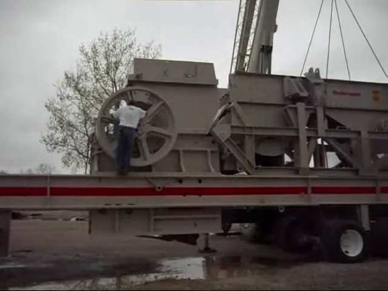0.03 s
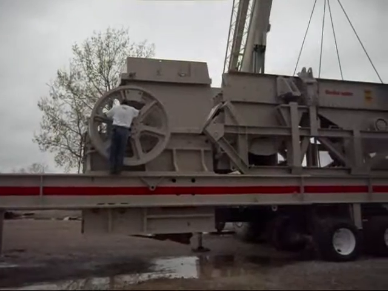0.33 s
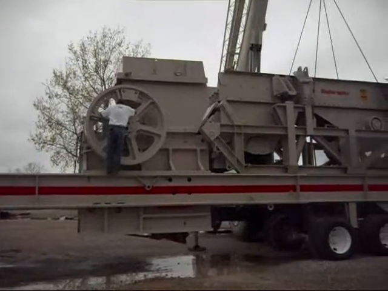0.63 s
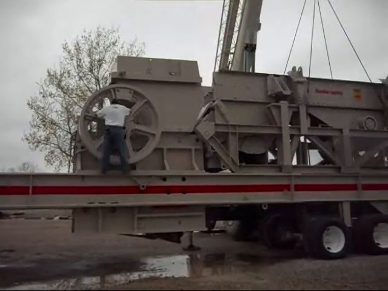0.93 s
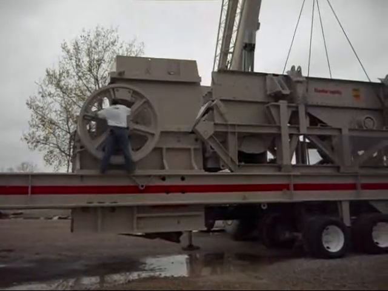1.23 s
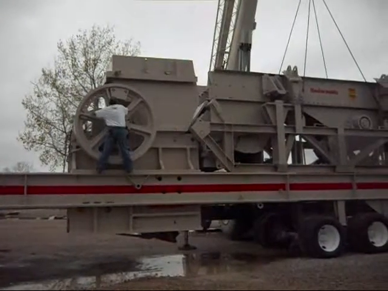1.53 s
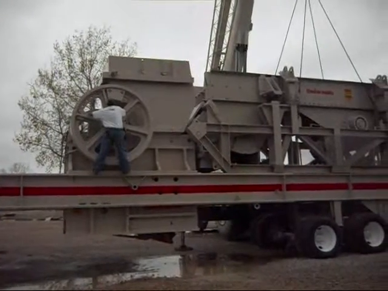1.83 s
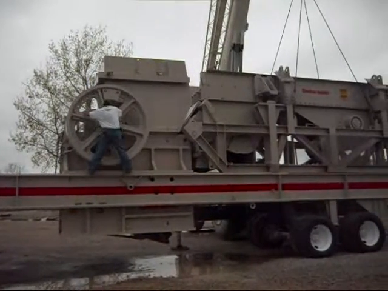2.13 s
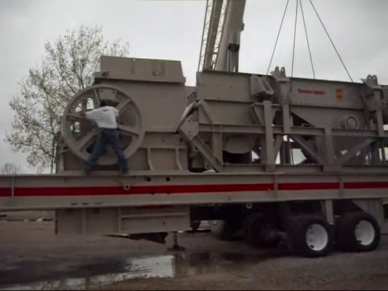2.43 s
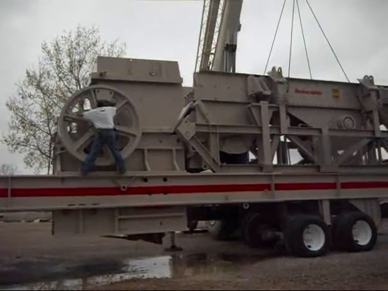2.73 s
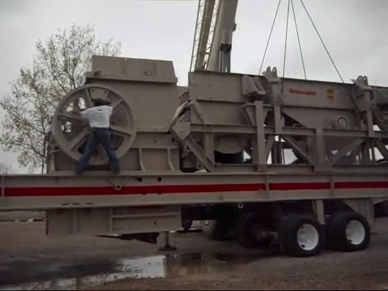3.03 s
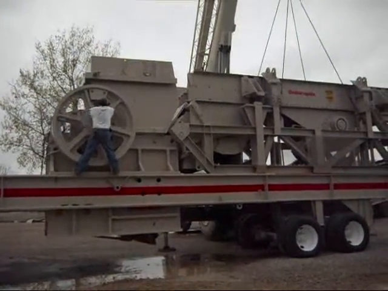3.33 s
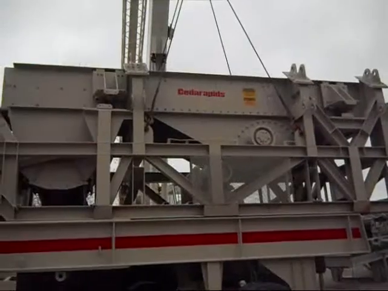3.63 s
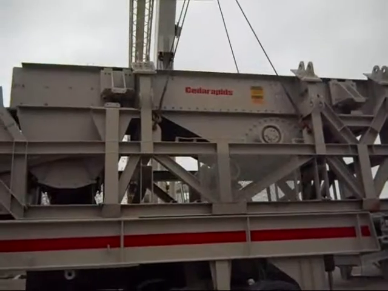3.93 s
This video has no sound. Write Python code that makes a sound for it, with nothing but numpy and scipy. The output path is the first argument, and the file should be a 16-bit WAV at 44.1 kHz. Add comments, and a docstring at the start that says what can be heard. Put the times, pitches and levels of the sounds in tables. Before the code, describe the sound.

A diesel engine throbs and clatters steadily in an open yard. Steel clanks twice at the start, a hiss builds and wind bumps the microphone. Near the end, after a tick, the hiss drops and a second engine booms.

```python
"""An open yard beside a jaw crusher plant, where a four-cylinder diesel runs steadily.
Its exhaust throbs, and combustion and valve knocks ring its body into a hard, repeating clatter.
An airy hiss builds, a second engine hums, wind bumps the microphone and steel clanks twice at the start.
Near the end the listening position jumps with a tick: the second engine booms and the hiss drops.
The whole yard is heard through a narrow, telephone-like band."""
import sys
import numpy as np
from scipy import signal
from scipy.fft import rfft, irfft, next_fast_len
from scipy.io import wavfile
from scipy.ndimage import uniform_filter1d, map_coordinates

SR = 44100
rng = np.random.default_rng(int(sys.argv[2]) if len(sys.argv) > 2 else 0)


def output_pcm(signal):
    """Save a mono or channel-first signal as 16-bit PCM at the path in sys.argv[1].

    Samples are clipped to [-1, 1] before scaling.
    """
    pcm = np.clip(np.atleast_2d(signal).T, -1, 1) * 32767
    wavfile.write(sys.argv[1], SR, np.round(pcm).astype(np.int16))


N = 176400
TIME_S = np.arange(N) / SR
JUMP_S = 3.532  # the listening position jumps here


def amp(db):
    """Decibels to gain."""
    return 10 ** (np.asarray(db) / 20)


def unit(x):
    """Scale to rms 1."""
    return x / np.sqrt(np.mean(x ** 2) + 1e-20)


def along(spectrum, hz):
    """Read (freq_hz, level_db) points on a log frequency axis."""
    freq_hz, level_db = np.transpose(spectrum)
    return np.interp(np.log(hz + 1), np.log(freq_hz + 1), level_db)


def curves(rows):
    """One automation curve for each column after the time."""
    time_s, *columns = np.transpose(rows)
    return [np.interp(TIME_S, time_s, column) for column in columns]


def wobble(knots_per_s):
    """A smooth random drift."""
    return map_coordinates(rng.standard_normal(256), [TIME_S * knots_per_s], mode="wrap")


def filtered(x, response):
    """EQ x with a gain given as a function of frequency."""
    size = next_fast_len(N + SR // 2)
    return irfft(rfft(x, size) * response(np.fft.rfftfreq(size, 1 / SR)), size)[:N]


def noise(spectrum, patchy_db=0):
    """Coloured noise of rms 1, mottled by patches of random gain in time and frequency."""
    bins = signal.stft(rng.standard_normal(N), nperseg=512)[2]
    patches = uniform_filter1d(rng.standard_normal(bins.shape), size=5, axis=0)
    patches = uniform_filter1d(patches, size=12, axis=1)
    mottled = signal.istft(bins * amp(patchy_db * unit(patches)), nperseg=512)[1][:N]
    return unit(filtered(mottled, lambda hz: amp(along(spectrum, hz))))


def lowpass(x, edge_hz, order=160):
    """A steep low-pass with a rounded edge."""
    return filtered(x, lambda hz: 1 / np.sqrt(1 + (hz / edge_hz) ** order))


# Low partials of the exhaust: firing_multiple, level_db
THROB_PARTIALS = [(1, -27), (2, -22.5), (3, -41)]
# Gentle swell on top of those levels: time_s, gain_db
THROB_SWELL = [(0, -2.5), (.8, 2), (1.25, 1.5), (1.6, -1), (2.4, 1), (3.1, -0.2), (3.5, 0), (4, -2)]


def exhaust_throb(cycles, lag_cycles=.115):
    """Four firings a cycle pulse out of the exhaust."""
    phase = 2 * np.pi * 4 * (cycles - lag_cycles)
    throb = sum(amp(db) * np.cos(multiple * phase) for multiple, db in THROB_PARTIALS)
    return np.sqrt(2) * throb * amp(curves(THROB_SWELL)[0])


# The knock rhythm of one engine cycle: position_cycles, accent_db
KNOCK_PATTERN = [(0.039, -6), (.09, -0.5), (0.273, 0), (.35, -1), (.43, 0), (0.521, -1.5), (0.576, -1),
                 (.67, -6), (.78, 0), (.85, 0.5), (0.942, -6.5)]


def knock_envelope(cycles, cycle_hz, rise_s=.0012, decay_s=.0045):
    """Combustion and valve knocks: sharp hits that add in power over a steady floor."""
    power = amp(-1.5) ** 2  # the floor between knocks
    for position, accent_db in KNOCK_PATTERN:
        age_s = (cycles - position) % 1 / cycle_hz
        hit = 2 * amp(accent_db) * (1 - np.exp(-age_s / rise_s)) * np.exp(-age_s / decay_s)
        power = power + hit ** 2
    return unit(np.sqrt(power))


# The bed of weak tones in the clatter: pitch_hz, level_per_tone_db
CLATTER_BED = [(20, -78), (90, -53.5), (150, -47), (400, -51), (600, -49.5), (900, -50), (1200, -51),
               (1600, -48.5), (2100, -62), (3300, -64), (4000, -85)]
# Strong body tones, ahead of their lift: cycle_multiple, before_jump_db, after_jump_db
BODY_TONES = [(20, -38, -39), (26, -39, -47), (32, -38, -45), (34, -31, -38), (44, -39, -47),
              (60, -36, -47), (72, -39, -47), (78, -41, -45), (79, -39, -47), (81, -41, -47),
              (84, -41, -47), (92, -39, -47), (95, -39, -47), (96, -35, -47), (98, -39, -47),
              (108, -41, -47), (110, -41, -47), (113, -42, -47), (114, -41, -47), (115, -40, -47),
              (118, -42, -47), (123, -40, -47), (124, -35, -47), (126, -38, -47), (128, -43, -47),
              (131, -43, -47), (138, -43, -47), (140, -35, -47), (147, -41, -47), (150, -41, -47),
              (152, -38, -47), (156, -43, -47), (159, -42, -47), (170, -43, -47), (179, -42, -47),
              (183, -43, -47)]


def clatter(cycles, cycle_hz, after_jump, lift_db=.72, size=8192):
    """The knocks ring the engine body alike in every cycle, which makes a dense comb of tones."""
    position = np.arange(size) / size
    comb = rfft(knock_envelope(position, cycle_hz) ** 2 * rng.standard_normal(size))
    level_db = along(CLATTER_BED, np.arange(len(comb)) * cycle_hz)
    multiples, before_db, after_db = np.transpose(BODY_TONES)
    level_db[np.round(multiples).astype(int)] = (after_db if after_jump else before_db) + lift_db
    # The phases carry the knock rhythm; the tables set the tone colour.
    loop = irfft(comb / np.abs(comb) * amp(level_db)) * size / np.sqrt(2)
    return np.interp(cycles, position, loop, period=1)


# Rattle colour before and after the jump: freq_hz, relative_db
RATTLE_EQ_BEFORE = [(30, -6), (150, -5.5), (230, -6.5), (300, -3), (450, -5), (700, -2.5), (1000, -1),
                    (1500, -4), (2050, -18), (2600, -9), (3050, -13), (3350, -10), (3750, -19.5),
                    (4000, -45.5)]
RATTLE_EQ_AFTER = [(30, -17), (300, -5), (600, -0.5), (1000, -0.5), (1500, -9.5), (2000, -18), (2600, -5.5),
                   (3050, -14), (3350, -15), (3750, -20), (4000, -43)]


def rattle(cycles, cycle_hz, after_jump):
    """The loose part of the clatter: noise that pulses with the knocks and never repeats."""
    texture = noise(RATTLE_EQ_AFTER if after_jump else RATTLE_EQ_BEFORE, patchy_db=1.18)
    return amp(-21) * knock_envelope(cycles, cycle_hz) * texture


# Near-steady pace of the four-stroke cycle: time_s, cycle_hz
ENGINE_SPEED = [(0, 7.8), (1.8, 7.796), (2.6, 7.813), (4, 7.815)]
# Fader ride on clatter and rattle, played around its average: time_s, relative_db
CLATTER_RIDE = [(0, -22), (.5, -21.5), (.8, -20.5), (1.2, -19.5), (1.3, -21.5), (2.3, -22), (3.45, -21.5),
                (3.72, -20), (4, -23)]


def diesel():
    """Exhaust throb, repeating clatter and loose rattle, all tied to the crankshaft."""
    cycles = np.cumsum(curves(ENGINE_SPEED)[0]) / SR
    cycle_hz = ENGINE_SPEED[0][1]
    knocks = np.zeros(N)
    for layer in (clatter, rattle):
        before = layer(cycles, cycle_hz, after_jump=False)
        after = layer(cycles, cycle_hz, after_jump=True)
        knocks += np.where(TIME_S < JUMP_S, before, after)
    ride_db, = curves(CLATTER_RIDE)
    return exhaust_throb(cycles) + amp(ride_db - ride_db.mean()) * knocks


# Build and drop of the hiss: time_s, level_db
HISS_RIDE = [(0, -46.5), (.7, -33.5), (1.5, -34), (1.9, -29), (2.4, -30.5), (2.85, -25.5), (3.51, -23.5),
             (3.54, -41), (4, -36.5)]
# Airy colour, strongest near 2 kHz: freq_hz, relative_db
HISS_EQ = [(300, -28), (1100, -9.5), (1600, -2), (2000, -2), (2500, -9.5), (3200, -15), (3750, -23),
           (4000, -42.5)]


def hiss():
    """A smooth airy hiss that grows until the position jumps."""
    return amp(curves(HISS_RIDE)[0]) * noise(HISS_EQ, patchy_db=-1.14)


# A hum that booms after the jump: time_s, pitch_hz, fundamental_db, octave_db
HUM_RIDE = [(0, 94.6, -34, -36), (1.2, 93.53, -40.5, -32.5), (2.1, 93.2, -31.5, -33.5),
            (2.55, 94.5, -46.5, -28), (2.75, 95.7, -20.5, -33.5), (3.05, 93.4, -34.5, -33),
            (3.5, 92.1, -32.5, -36), (3.56, 90.9, -15, -30.5), (3.76, 93.14, -12, -25.5),
            (3.9, 96.36, -16, -37), (4, 96.4, -12, -53)]


def second_engine(waver_hz=1.3, waver_db=2.5):
    """A wavering exhaust hum: the firing tone and its octave."""
    pitch_hz, fundamental_db, octave_db = curves(HUM_RIDE)
    phase = 2 * np.pi * np.cumsum(pitch_hz + waver_hz * wobble(5.5)) / SR
    fundamental = amp(fundamental_db) * np.sin(phase)
    octave = amp(octave_db + waver_db * wobble(9)) * np.sin(2 * phase)
    return np.sqrt(2) * (fundamental + octave)


# Rise and fall of the breeze: time_s, level_db
WIND_RIDE = [(0, -25), (.2, -31), (.7, -34.5), (.9, -18), (1.25, -25.5), (1.42, -25.5), (2.03, -27.5),
             (2.16, -20), (2.3, -26), (2.42, -28), (2.75, -23.5), (3, -30.5), (3.35, -23.5), (3.65, -24),
             (4, -41.5)]
# Deep buffeting colour: freq_hz, relative_db
WIND_EQ = [(5, 0), (25, -2), (45, 0), (80, -2.5), (130, -6.5), (220, -15), (600, -47)]


def wind_rumble():
    """Soft gusts rumble on the microphone."""
    return amp(curves(WIND_RIDE)[0]) * noise(WIND_EQ, patchy_db=2.5)


# A firm clank, then a faint one: start_s, strength_db
CLANK_HITS = [(.097, -16.5), (.355, -29)]
# Dull steel colour in two broad humps: freq_hz, relative_db
CLANK_EQ = [(200, -27.5), (700, -2), (1100, 0.5), (2000, -12.5), (2800, -3.5), (3400, -1.5), (4000, -29.5)]


def steel_clanks(rise_s=.012, decay_s=.019):
    """Short scraping clanks of heavy steel, with hardly any ring."""
    envelope = np.zeros(N)
    for start_s, strength_db in CLANK_HITS:
        age_s = np.maximum(TIME_S - start_s, 0)
        envelope += 2 * amp(strength_db) * (1 - np.exp(-age_s / rise_s)) * np.exp(-age_s / decay_s)
    return envelope * noise(CLANK_EQ)


# Sudden gusts: centre_s, level_db
THUMP_HITS = [(1.07, -26), (2.15, -17.5), (2.2, -19.5)]
# Round, bassy colour: freq_hz, relative_db
THUMP_EQ = [(20, -6), (70, 0), (125, -0.5), (200, -6.5), (300, -21.5), (600, -51)]


def wind_thumps(half_width_s=.03):
    """Sudden gusts thump the microphone, each a brief swell of low noise."""
    envelope = sum(amp(level_db) * np.exp(-((TIME_S - centre_s) / half_width_s) ** 2)
                   for centre_s, level_db in THUMP_HITS)
    return envelope * noise(THUMP_EQ)


def jump_tick(corner_hz=4000):
    """One thin tick, an impulse with softened treble, marks the jump in position."""
    impulse = amp(-6) * (np.arange(N) == round(JUMP_S * SR))
    return filtered(impulse, lambda hz: 2 / (1 + 1j * hz / corner_hz))


def scene():
    """The yard mixed to mono at one microphone."""
    return (diesel() + hiss() + second_engine() + wind_rumble() + steel_clanks() + wind_thumps())[None]


def record(dry):
    """Narrow the yard to a telephone-like band; only the tick reaches above it."""
    narrow = lowpass(dry[0], edge_hz=4000)
    return lowpass(narrow + jump_tick(), edge_hz=13500)[None]


dry = scene()
out = record(dry)
output_pcm(out)
```